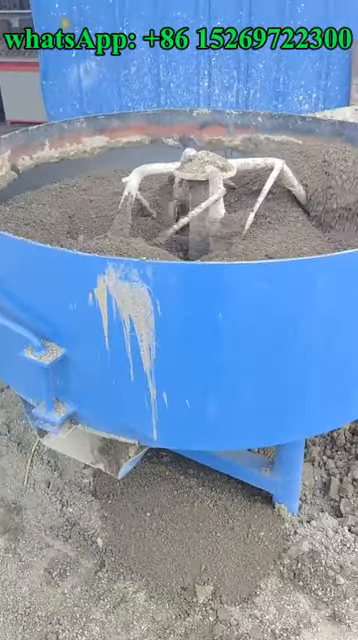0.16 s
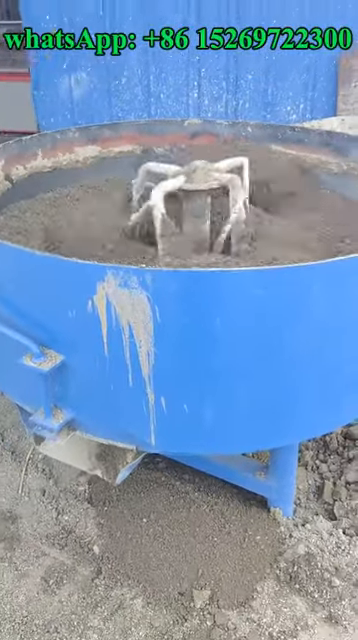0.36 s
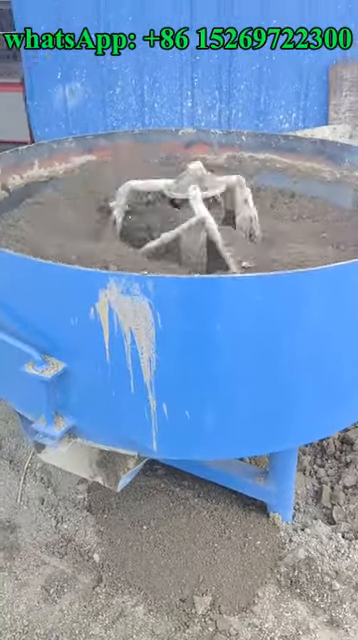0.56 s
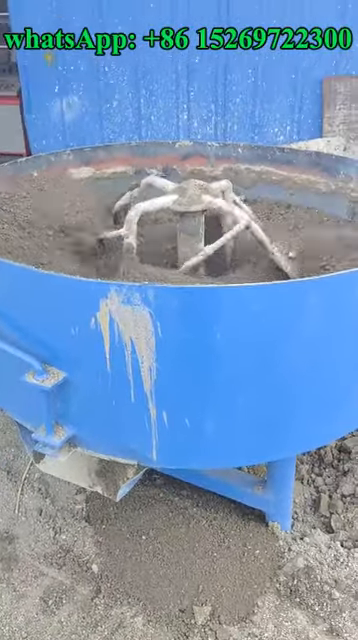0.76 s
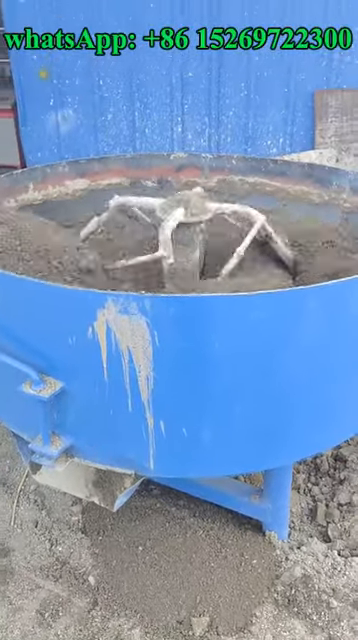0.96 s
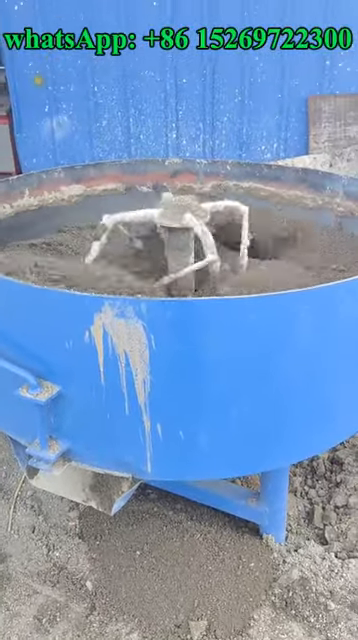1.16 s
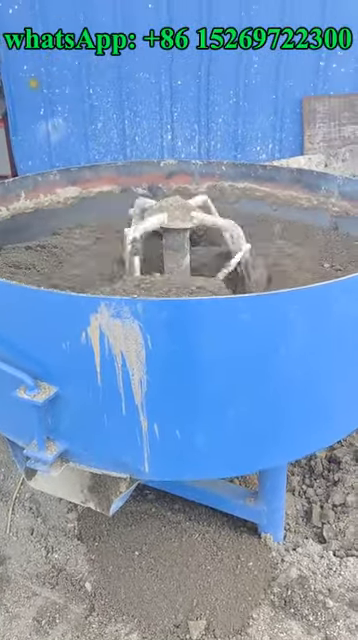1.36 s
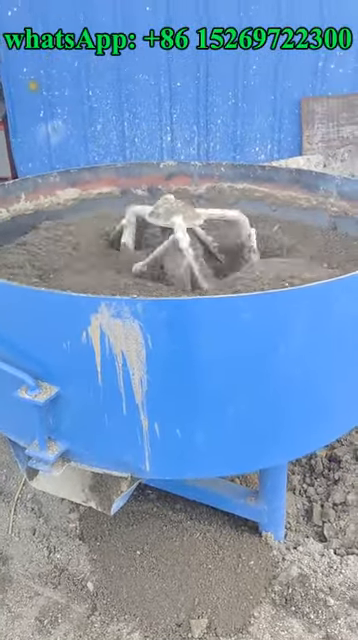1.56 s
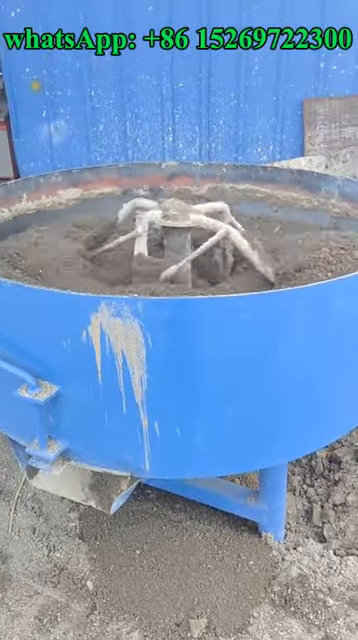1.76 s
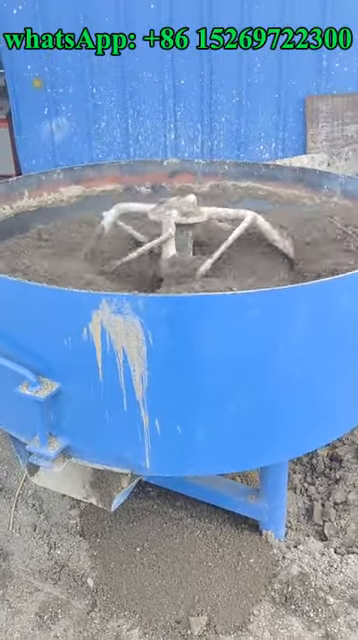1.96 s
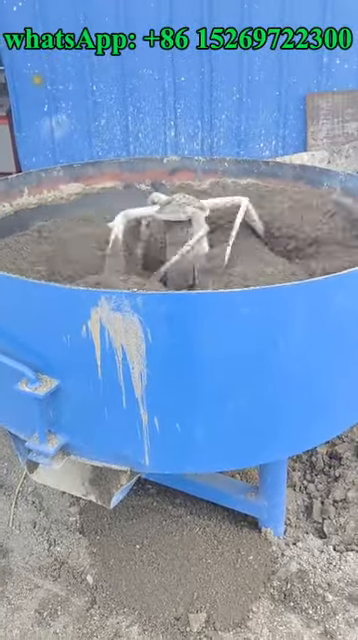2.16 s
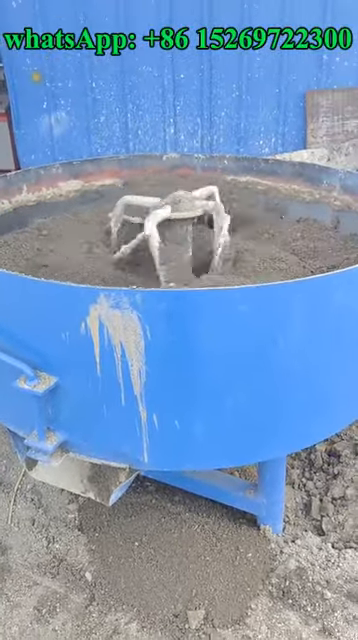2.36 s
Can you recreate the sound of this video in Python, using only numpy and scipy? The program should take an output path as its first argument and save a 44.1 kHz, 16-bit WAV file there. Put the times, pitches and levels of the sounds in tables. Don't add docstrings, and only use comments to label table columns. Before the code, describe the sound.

A concrete pan mixer runs steadily close by outdoors, its gears humming over a low engine and coarse gritty churning; a thin chirp, a sharp metal squeal and a falling groan come in turn.

```python
import sys
import numpy as np
from scipy import signal
from scipy.fft import rfft, irfft, next_fast_len
from scipy.io import wavfile

SR = 44100
rng = np.random.default_rng(int(sys.argv[2]) if len(sys.argv) > 2 else 0)


def volts_from_decibels(level):
    exponent = np.asarray(level, float) / 20
    return 10 ** exponent


def output_pcm(signal):
    pcm = np.clip(np.atleast_2d(signal).T, -1, 1) * 32767
    wavfile.write(sys.argv[1], SR, np.round(pcm).astype(np.int16))


N = 111573


def rms_one(x):
    return x / np.sqrt(np.mean(x ** 2) + 1e-20)


def in_time(rows):
    s, *columns = np.transpose(rows)
    return [np.interp(np.arange(N) / SR, s, column) for column in columns]


def at_hz(points, hz):
    table = np.array(points)
    return np.interp(np.log(hz), np.log(table[:, 0]), table[:, 1])


def drift(rate):
    step = 40
    r = np.exp(-2 * np.pi * rate * step / SR)
    noise = rng.standard_normal(N // step + 2002)
    slow = signal.lfilter([1], [1, -2 * r, r * r], noise)[2000:]
    return np.interp(np.arange(N) / step, np.arange(len(slow)), rms_one(slow))


def ports(x, pan_db=0., left_lag_s=0.00024):
    size = next_fast_len(N + 64)
    delay = np.exp(-2j * np.pi * np.arange(size // 2 + 1) * SR / size * left_lag_s)
    left = irfft(rfft(x, size) * delay, size)[:N]
    return np.array([left * volts_from_decibels(pan_db / 2), x * volts_from_decibels(-pan_db / 2)])


# frequency in Hz, left over right in dB.
BALANCE = [(100, 2), (250, -5.5), (400, 5), (700, 4), (1200, -3), (2500, 0), (4000, 2.5), (12000, -2)]
# frequency in Hz, likeness from 0 to 1.
LIKENESS_BY_HZ = [(60, 1), (200, 1), (500, 0.31), (900, .8), (1400, .5), (2500, 0), (8000, 0.09)]


def spread(shared, own, hz):
    alike = np.clip(at_hz(LIKENESS_BY_HZ, hz), 0, 1)
    side_db = at_hz(BALANCE, hz) * np.array([[.5], [-.5]])
    return (np.sqrt(alike) * shared + np.sqrt(1 - alike) * own) * volts_from_decibels(side_db)


def grit(size_db):
    grains_per_s = 2500
    struck = rng.random((3, N)) < grains_per_s / SR
    hits = struck * volts_from_decibels(size_db * np.minimum(rng.exponential(1, (3, N)), 5))
    strikes = rms_one(hits * rng.choice([-1, 1], (3, N)))
    x = strikes * 0.5 + rng.standard_normal((3, N))
    return np.vstack([ports(x[0]), x[1:]])


def bands(spectrum, low_hz, per_octave, count, size_db, patchy_db, shared_db):
    out = 0
    edges = low_hz * 2 ** (np.arange(count + 1) / per_octave)
    white = [grit(size_db), grit(size_db)]
    for k, (low, high) in enumerate(zip(edges, np.minimum(edges[1:], .45 * SR))):
        band = signal.butter(2, [low, high], "band", fs=SR, output="sos")
        x = signal.sosfilt(band, white[k % 2])
        hz = np.sqrt(low * high)
        level_db = at_hz(spectrum, hz) + patchy_db * drift(9.5) + shared_db
        out = out + volts_from_decibels(level_db) * spread(x[:2], x[2:], hz)
    return out


# time in seconds, firing rate in Hz, then levels in dB of its first, second and third multiple.
ENGINE_REVS = [(0.0, 32.9, -23, -18, -31), (0.06, 33.5, -30.5, -27, -34), (0.32, 37.46, -23, -23, -29),
               (0.48, 38.3, -30, -31.5, -43), (0.56, 39.6, -27, -27.5, -29), (0.76, 40.36, -24, -29, -43),
               (1.01, 42.9, -31, -41, -48), (1.57, 48.66, -25, -27, -60), (1.61, 49.9, -26, -30, -36),
               (1.8, 50.8, -25.5, -43, -50), (1.89, 51.6, -25.5, -27.5, -36), (2.17, 48.3, -29, -27, -56),
               (2.51, 48.0, -29.5, -33.5, -46), (2.53, 48.0, -40, -24, -34)]


def engine():
    hz, *levels = in_time(ENGINE_REVS)
    turn = 2 * np.pi * np.cumsum(hz) / SR
    out = 0
    for k, db in enumerate(levels):
        flutter_db = 1.1 * drift(14)
        out = out + np.sqrt(2) * volts_from_decibels(db + flutter_db) * np.sin((k + 1) * turn + k)
    return ports(out, -0.41)


# frequency in Hz, rms level in dB.
GEAR_TONES = [(236.9, -36.5), (290.7, -49), (387.6, -28), (484.5, -41), (522.2, -40), (586.8, -47),
              (672.9, -34), (850.6, -32), (920.5, -30.5), (1179, -32), (1270, -33.5), (1416, -34.5)]
# time in seconds, change in dB.
DRIVE_LOAD = [(0, -2), (.35, -1.5), (.45, -1.5), (.65, 0.5), (1.2, -1.5), (1.6, 1), (2.1, 2), (2.27, 3),
              (2.33, -10.5), (2.4, 1), (2.53, 0)]


def gears():
    t = np.arange(N) / SR
    load_db, = in_time(DRIVE_LOAD)
    main_hz = GEAR_TONES[2][0]
    blur_rate = 9
    out = 0
    for hz, db in GEAR_TONES:
        blur = volts_from_decibels(-13 + 6 * abs(np.log2(hz / main_hz)))
        uneven = 1 + blur * (drift(blur_rate) + 1j * drift(blur_rate))
        tone = rms_one(np.real(uneven * np.exp(2j * np.pi * (hz * t + rng.random()))))
        load_share = 1 if hz == main_hz else 0.32
        swing_db = load_db * load_share + .6 * drift(1.5)
        out = out + ports(volts_from_decibels(db + swing_db) * tone, at_hz(BALANCE, hz))
    return out


# time in seconds, level in dB.
SAND_FLOW = [(0, -51.5), (.04, -61.5), (.12, -56), (.25, -60), (.72, -63.5), (.965, -68), (.987, -53.5),
             (1.02, -62.5), (1.1, -63.5), (1.14, -59), (1.42, -59.5), (1.47, -58.5), (1.5, -52),
             (1.555, -48.5), (1.64, -54.5), (1.7, -60), (2.2, -63), (2.53, -63)]


def sliding():
    flow_db, = in_time(SAND_FLOW)
    surge_db = 0.24 * (flow_db - flow_db.mean()) + 0.35 * drift(5.4)
    return flow_db, surge_db


# frequency in Hz, width in Hz, rms level in dB.
PAN_RINGS = [(227.4, 50, -41), (391, 54, -38.5), (600, 46.4, -31.5), (683.7, 21, -34), (904, 120, -31),
             (1069, 65, -35.5), (1194, 62, -33.5), (1302.5, 58, -32.5), (1414, 80, -45.5),
             (2044, 157, -34.5), (2975, 335, -39), (4300, 400, -48.5)]


def pan(surge_db):
    out, white = 0, grit(2.25)
    for hz, width, db in PAN_RINGS:
        r = np.exp(-np.pi * width / SR)
        b, a = [1, 0, -0.996], [1, -2 * r * np.cos(2 * np.pi * hz / SR), r * r]
        x = rms_one(signal.lfilter(b, a, signal.lfilter(b, a, white)))
        out = out + volts_from_decibels(db + 0.84 * drift(7.5) + surge_db) * spread(x[:2], x[2:], hz)
    return out


# frequency in Hz, level in dB per Hz.
CHURN_COLOUR = [(18, -27), (30, -12), (290, -8), (385, -7.5), (746, -11.5), (922, -7.5), (3080, -20.5),
                (7380, -50.5), (8500, -80.5), (11000, -101), (18700, -120)]


def churn(surge_db):
    x = bands(CHURN_COLOUR, 35.56, 2.5, count=20, size_db=2., patchy_db=1.3, shared_db=surge_db)
    return volts_from_decibels(-25.5) * rms_one(x)


# frequency in Hz, level in dB per Hz.
SAND_COLOUR = [(2500, -2.5), (4700, -15), (7000, -14), (8000, -30.5), (8700, -35), (9500, -23),
               (13000, -28), (15500, -19.5)]


def sand(flow_db):
    flicker_db = 1.1 * drift(20)
    x = bands(SAND_COLOUR, 2800, 5.5, count=14, size_db=3., patchy_db=1.2, shared_db=flicker_db)
    return volts_from_decibels(flow_db + 15.5) * rms_one(x)


def squeak(rows, overtones_db, tone_from, upper_from):
    hz, db = in_time(rows)
    t = np.arange(N) / SR
    fade_in = np.clip((t - rows[0][0]) / .004, 0, 1)
    fade_out = np.clip((rows[-1][0] - t) / .006, 0, 1)
    turn = 2 * np.pi * np.cumsum(hz) / SR
    loudest_db = max(row[2] for row in rows)
    chatter_db = .8 * drift(60)
    level = np.sqrt(2) * volts_from_decibels(db + chatter_db) * fade_in * fade_out
    tone = level * np.sin(turn)
    upper = 0
    for k, overtone_db in enumerate(overtones_db):
        growth_db = 1.1 * (db - loudest_db)
        upper = upper + level * volts_from_decibels(overtone_db + growth_db) * np.sin((k + 2) * turn)
    return ports(tone, *tone_from) + ports(upper, *upper_from), tone + upper


# time in seconds, pitch in Hz, level in dB.
CHIRP_PATH = [(.736, 6740, -62), (.75, 6710, -40), (.761, 6630, -22), (.775, 6520, -21), (.8, 6510, -24),
              (.82, 6530, -44), (.836, 6520, -38), (.85, 6550, -52), (.87, 6560, -46)]


def chirp():
    return squeak(CHIRP_PATH, [-28], tone_from=(1, .00005), upper_from=(1, .00005))


# time in seconds, pitch in Hz, level in dB.
SQUEAL_PATH = [(0.965, 2277, -39), (0.989, 2305, -12), (1.003, 2333, -10), (1.019, 2324, -26),
               (1.041, 2280, -11.5), (1.057, 2293, -11.5), (1.085, 2270, -32)]


def squeal():
    return squeak(SQUEAL_PATH, [-18, -27, -44, -48], tone_from=(-6, -.000025), upper_from=(4, .00014))


# time in seconds, pitch in Hz, level in dB.
GROAN_PATH = [(1.665, 1200, -32), (1.682, 1140, -20), (1.705, 1050, -18), (1.722, 1010, -23),
              (1.736, 950, -15), (1.748, 922, -12), (1.775, 920, -16), (1.805, 920, -20), (1.83, 915, -34)]


def groan():
    return squeak(GROAN_PATH, [-14, -28], tone_from=(4, .00028), upper_from=(-2, 0))


def yard(x):
    t = np.arange(int(.5 * SR)) / SR
    sparse = rng.standard_normal((2, len(t))) * (rng.random((2, len(t))) < .02)
    taps = sparse * volts_from_decibels(-60 * t / .45) * (t > .03)
    taps = taps / np.sqrt(np.sum(taps ** 2, axis=1, keepdims=True))
    return volts_from_decibels(-19) * signal.fftconvolve(x[None], taps, axes=1)[:, :N]


def scene():
    drive = engine() + gears()
    flow_db, surge_db = sliding()
    dull = signal.butter(8, 7600, fs=SR, output="sos")
    mix = signal.sosfilt(dull, pan(surge_db) + churn(surge_db))
    hiss = sand(flow_db)
    slips = [chirp(), squeal(), groan()]
    direct = sum(at_ports for at_ports, _ in slips)
    echoes = yard(sum(plain for _, plain in slips))
    return drive + mix + hiss + direct + echoes


def roll_off(x):
    return signal.sosfilt(signal.butter(12, 15500, fs=SR, output="sos"), x)


def record(dry):
    top_cut = signal.cheby2(12, 50, 16400, fs=SR, output="sos")
    return roll_off(signal.sosfilt(top_cut, dry))


dry = scene()
out = record(dry)
output_pcm(out)
```